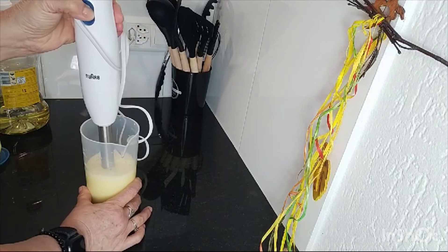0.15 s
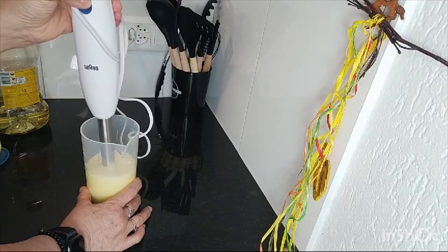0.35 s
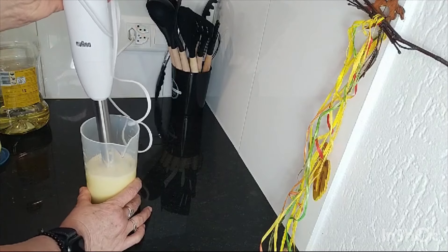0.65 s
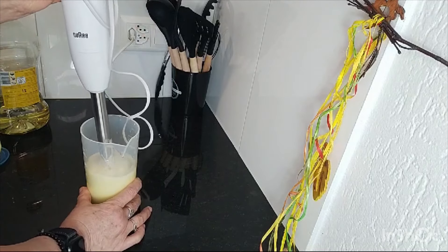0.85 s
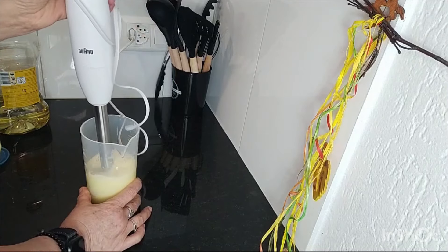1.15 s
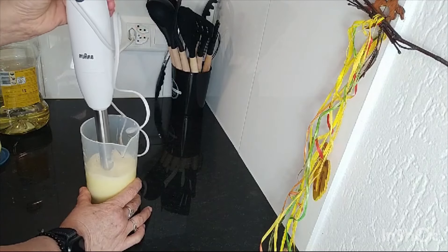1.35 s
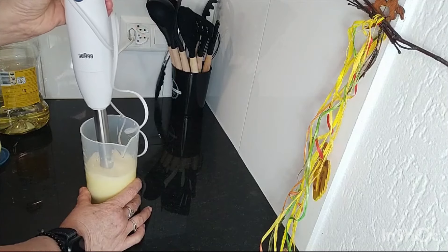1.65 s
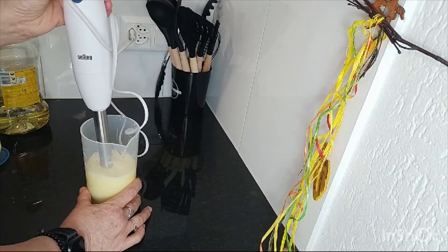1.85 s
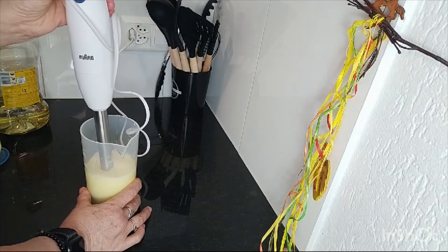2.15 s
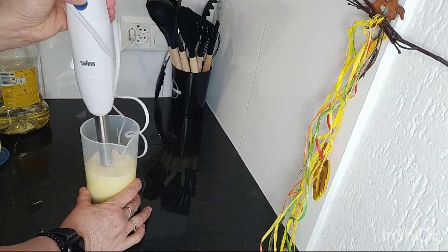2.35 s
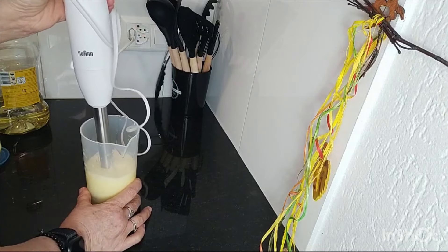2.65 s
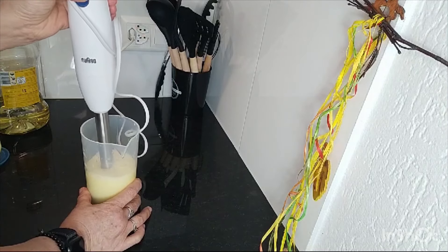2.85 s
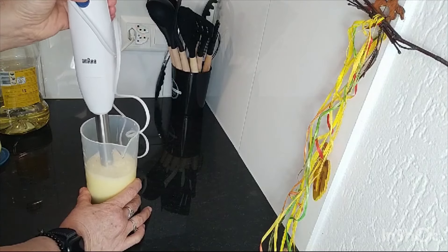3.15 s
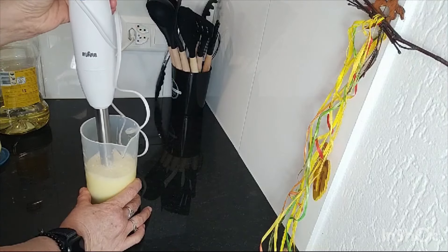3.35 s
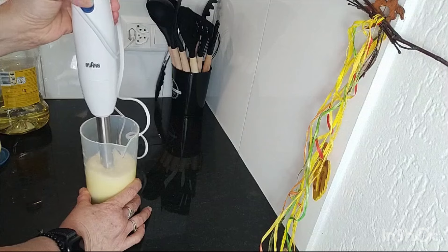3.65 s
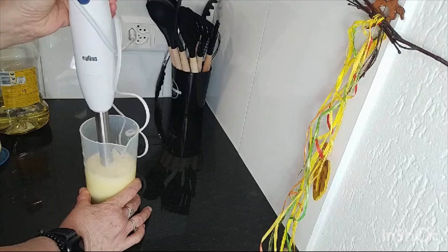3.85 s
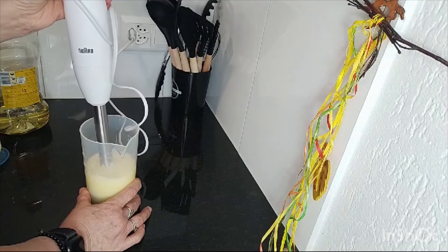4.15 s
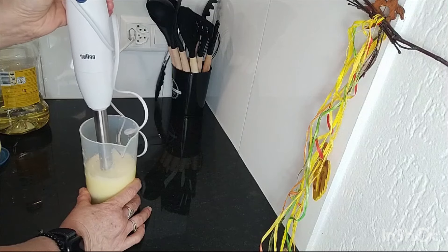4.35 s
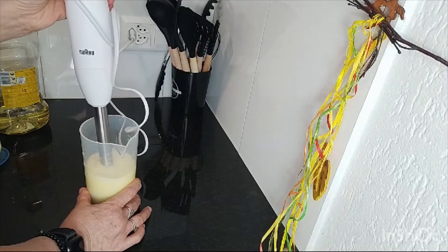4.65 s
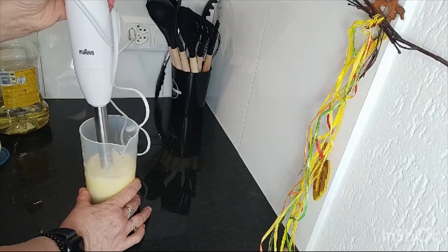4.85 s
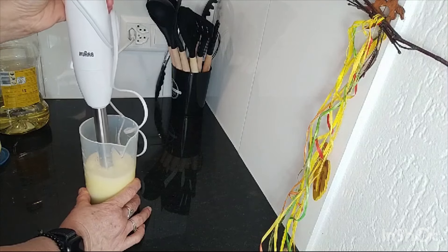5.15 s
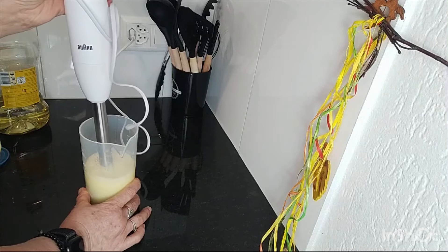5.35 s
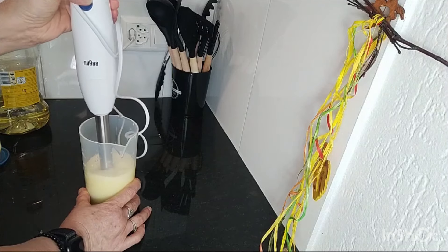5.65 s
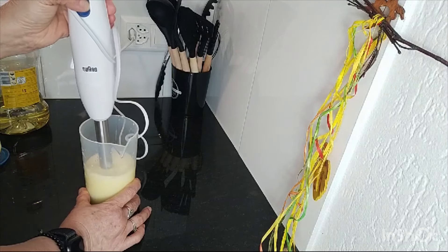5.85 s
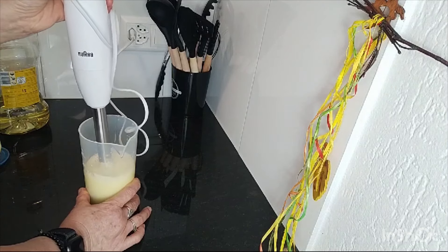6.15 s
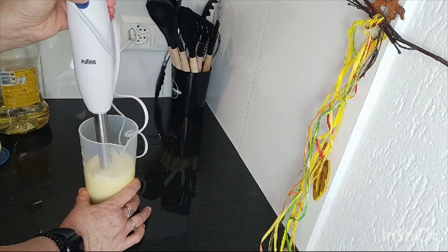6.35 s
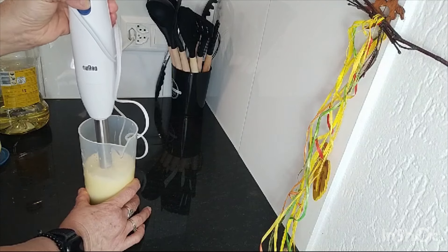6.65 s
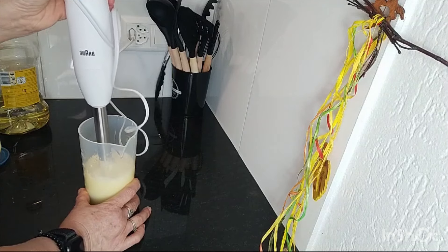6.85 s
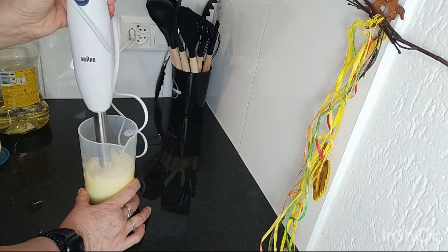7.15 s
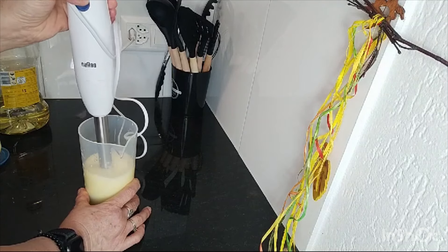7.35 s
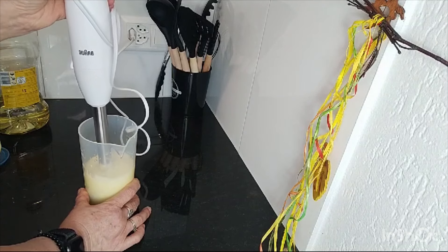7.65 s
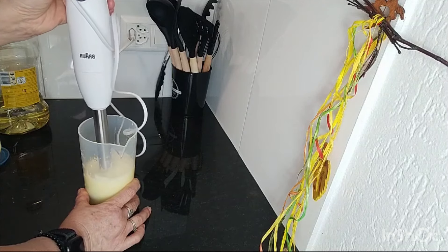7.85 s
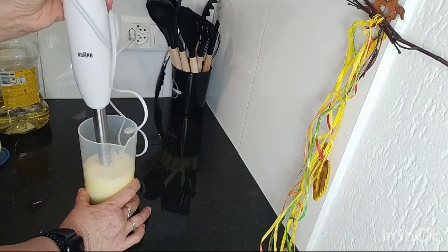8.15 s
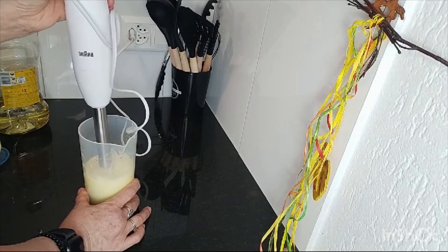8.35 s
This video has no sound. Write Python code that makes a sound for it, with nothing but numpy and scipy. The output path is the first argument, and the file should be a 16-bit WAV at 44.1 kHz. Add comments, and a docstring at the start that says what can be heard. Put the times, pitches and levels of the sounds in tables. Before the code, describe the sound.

An electric stick blender works thick sauce in a plastic cup, heard close with a short room reflection. The opening burst dies away, a few hollow taps sound, then a long buzzing run grows rougher and louder. Quick presses follow, each spinning up almost instantly and winding down, with one sharp knock midway. The last press is very brief and fades towards soft kitchen hum and a faint tap.

```python
"""A hand blender is heard mid-burst in a plastic beaker of thickening sauce, over a low kitchen hum.
It soon coasts down, and the wand knocks on the beaker; a long burst and then shorter ones follow,
with a loud knock early in the third and fainter ones late on. Each press spins the motor up; its speed
and the blade's load set the levels: the shaft hums at multiples of its turning, noise impacts churn
and rattle the beaker, the commutator's uneven pattern whines and filtered noise hisses at the brushes."""
import sys
import numpy as np
from scipy import signal
from scipy.fft import rfft, irfft, next_fast_len
from scipy.io import wavfile

SR = 44100
rng = np.random.default_rng(int(sys.argv[2]) if len(sys.argv) > 2 else 0)


def master(y):
    """Save y as 16-bit WAV."""
    cut = np.clip(np.atleast_2d(y).T, -1, 1)
    pcm = np.round(cut * 32767)  # scale
    wavfile.write(sys.argv[1], SR, pcm.astype(np.int16))


N = 374409
TIME = np.arange(N) / SR   # s


def from_db(db):
    """Decibels to a gain."""
    return 10 ** (np.asarray(db) / 20)


def rms_one(x):
    """Scale a signal to an RMS of 1."""
    return x / np.sqrt(np.mean(x ** 2) + 1e-20)


def drift(rate):
    """Smooth chance with spread 1, changing about `rate` times a second."""
    step = 20   # samples between slow values
    pole = np.exp(-2 * np.pi * rate * step / SR)
    noise = rng.standard_normal(N // step + 4002)
    slow = signal.lfilter([1], [1, -2 * pole, pole * pole], noise)[4000:]   # settled part
    return np.interp(np.arange(N) / step, np.arange(len(slow)), rms_one(slow))


def in_time(rows):
    """The columns of a curve, drawn sample by sample."""
    s, *columns = np.transpose(rows)
    return [np.interp(TIME, s, column) for column in columns]


def band(x, edges_hz, kind, order=4):
    """Butterworth filter."""
    return signal.sosfilt(signal.butter(order, edges_hz, kind, fs=SR, output="sos"), x)


def colour(x, spectrum, resonances=()):
    """Causal filter made of a broad spectrum and resonant peaks."""
    size = 2 * next_fast_len(N // 2 + SR // 4)
    hz = np.maximum(np.arange(size // 2 + 1) * SR / size, 1)
    points = np.array(spectrum)
    db = np.interp(np.log(hz), np.log(points[:, 0]), points[:, 1])
    for centre, width, lift in resonances:
        db = db + lift / (1 + (2 * (hz - centre) / width) ** 2)
    cepstrum = irfft(db * np.log(10) / 20)   # minimum phase: things ring after the blow
    cepstrum[1:size // 2] *= 2
    cepstrum[size // 2 + 1:] = 0
    response = np.exp(rfft(cepstrum))
    return irfft(rfft(x, size) * response)[:N]


def kitchen(x, t60, wet_db, wall_hz):
    """Direct sound plus a dense, dull tail from the tiled walls."""
    t = TIME[:SR // 2]
    tail = band(rng.standard_normal(len(t)), wall_hz, "low", order=1)
    tail = tail * from_db(-60 * t / t60) * (t > .004)   # starts after a 4 ms gap
    tail = tail / np.sqrt(np.sum(tail ** 2))
    return x + from_db(wet_db) * signal.fftconvolve(x, tail)[:N]


# the button is held: (pressed t/s, released t/s, coasting time constant t/s,
# unbalance hum level/dB at reference load, before the shaft's trim)
BUTTON_PRESSES = [(-.5, .256, 0.29, -41), (1.446, 3.94, 0.41, -39), (4.15, 4.57, .38, -40.5),
                  (4.7, 5.272, 0.33, -42), (5.435, 6.61, .34, -42), (6.878, 7.26, 0.34, -36.5),
                  (7.77, 7.942, 0.3, -38)]
SPIN_UP_S = .04   # time constant of running up
FRICTION = .13    # dry friction as a share of the drag at full speed


def motor_run():
    """Speed share and inrush current: the motor runs up at each press, then coasts on drag and friction."""
    pace, inrush = np.zeros((2, N))
    for on, off, coast_s, _ in BUTTON_PRESSES:
        held = np.clip(TIME, on, off) - on
        lacking = (1 - np.interp(on, TIME, pace)) * np.exp(-held / SPIN_UP_S)
        fade = np.exp(-np.maximum(TIME - off, 0) / coast_s)
        coasting = (1 - lacking + FRICTION) * fade - FRICTION
        pace = np.where(TIME >= on, np.maximum(coasting, 0), pace)
        inrush = np.where(TIME >= on, lacking * (TIME < off), inrush)
    return pace, inrush


def latest_press():
    """For every sample, the row of the press that began last."""
    rows = np.array(BUTTON_PRESSES)
    return rows[np.searchsorted(rows[:, 0], TIME, side="right") - 1].T


def impacts(turn, per_s, size_db, swing_db, clump_db, clump_rate, wash):
    """Blade hits on sauce and air pockets: random and in clumps; swing_db favours one side of a turn."""
    struck = rng.random(N) < per_s / SR
    hits = struck * rng.standard_normal(N) * from_db(size_db * np.minimum(rng.exponential(1, N), 4))
    stream = rms_one(hits) + wash * rng.standard_normal(N)
    return rms_one(stream * from_db(swing_db * np.cos(turn) + clump_db * drift(clump_rate)))


# broad colour of the churning: (f/Hz, relative level/dB)
CHURN_COLOUR = [(70, -44), (100, -16.5), (135, -18), (170, -9), (230, -11), (310, -5), (440, -2.5),
                (620, -6), (800, -1), (1100, -2.5), (1500, -7), (2200, -9), (2700, -13), (3600, -18),
                (4500, -24.5), (7000, -38.5)]
# resonances of beaker, wand and counter: (f/Hz, width f/Hz, lift level/dB above the broad colour)
BODY_RESONANCES = [(199.6, 63, 8.5), (344.2, 49, 14), (483, 38, 1.5), (587, 30, 6), (712, 60, 7.5),
                   (774, 118, 7.5), (911, 29, 5), (1000, 86, 6), (1053, 20, 5), (1227, 130, 2.5),
                   (1230, 52, 2), (1382, 110, 4.5), (1565, 33, 5), (1632, 40, 7.5), (1893, 99, 3.5),
                   (2035, 108, 6), (3690, 78, 4)]


def churning(turn, deep, rattle, crackle):
    """Heavy slaps shake the beaker's low resonances; small collapsing pockets crackle above them."""
    slaps = impacts(turn, per_s=1300, size_db=1, swing_db=0, clump_db=.5, clump_rate=26, wash=.67)
    pops = impacts(turn, per_s=1600, size_db=.3, swing_db=-1, clump_db=1.2, clump_rate=17.6, wash=1)
    heavy = colour(slaps, CHURN_COLOUR, BODY_RESONANCES)
    fine = colour(pops + .64 * slaps, CHURN_COLOUR, BODY_RESONANCES)
    low = rms_one(band(heavy, 621, "low", order=6))
    middle = rms_one(band(heavy, [590, 1200], "band"))
    high = rms_one(band(fine, 1197, "high", order=6))
    return from_db(-3.5) * deep * low + from_db(-5) * rattle * middle + from_db(-1.5) * crackle * high


# weaker shaft orders: (multiple of the turning, level/dB against the rattle)
SHAFT_OVERTONES = [(3, -19.5), (5, -14), (6, -26), (7, -19), (8, -24), (10, -23), (11, -27)]
HUM_POWER = 7.5   # all orders die with this power of speed


def shaft(turn, pace, once, twice, four, rattle, flutter_db, chop_db, wobble, speed_power):
    """Unbalance and two blade wings hum in low orders shaken by uneven load; upper ones fade sooner."""
    drive = pace ** speed_power
    choppy = rms_one(from_db(chop_db * drift(80)))   # the wings bite and slip in the sauce
    orders = [(1, once * from_db(-4)),
              (2, twice * from_db(-.5)),
              (4, four * choppy * drive * from_db(-3.5))]
    orders += [(multiple, rattle * drive * from_db(db)) for multiple, db in SHAFT_OVERTONES]
    angle = turn + wobble * drift(16.6)   # wobble in radians
    tones = np.zeros(N)
    for multiple, gain in orders:
        flutter = from_db(flutter_db * drift(17))
        tones += gain * flutter * np.sin(multiple * angle + rng.uniform(0, 2 * np.pi))
    return np.sqrt(2) * tones * pace ** HUM_POWER


# commutator whine: (multiple of the turning, relative level/dB, level/dB lost per side order)
WHINE_ORDERS = [(24, -17, 11), (36, -10, 11), (39, -21, 5), (48, -9.5, 11), (60, -10, 5), (72, -7, 6),
                (75, -15, 6), (84, -8, 7), (96, -7, 7), (108, -7, 7), (120, -7, 7), (132, -7, 7)]
# motor housing resonances that the gliding whine sweeps through: (f/Hz, relative level/dB)
HOUSING_COLOUR = [(1200, 3), (2800, 16.5), (4000, 1.5), (5600, -2.5), (7100, -1), (8300, -3.5), (9300, -2),
                  (10200, -10.5), (11700, -3.5), (12700, 1), (13700, 7.5), (14500, 2.5), (15600, -3.5)]
# colour of the brush hiss: (f/Hz, relative level/dB)
HISS_COLOUR = [(1500, 4.5), (3000, 4.5), (4500, -12), (5500, 0.5), (6300, -1), (7600, 6.5), (8600, -3),
               (10200, -8.5), (11700, 2), (12800, 3), (14200, 11), (15000, 14.5), (15700, 4), (17000, -37)]
MAINS_HZ = 50


def commutator(turn, whine_gain, hiss_gain, jitter, ripple, bounce, flutter_db):
    """Uneven segments tick past the brushes with side orders; the pattern shifts as the brushes bounce."""
    throb = np.sin(2 * np.pi * (2 * MAINS_HZ) * TIME)   # torque throbs with each mains half-cycle
    angle = turn + jitter * drift(25) + ripple * throb  # jitter and ripple in radians
    orders = np.arange(136)
    skirts = [from_db(db - skirt_db * abs(orders - multiple)) for multiple, db, skirt_db in WHINE_ORDERS]
    strength = np.max(skirts, axis=0)
    size = 4096   # points in one turn
    place = angle / (2 * np.pi) % 1 * size
    whine = np.zeros(N)
    for share in (1, bounce * drift(60), bounce * drift(60)):   # one steady and two shifting patterns
        phases = np.exp(2j * np.pi * rng.random(len(orders)))
        one_turn = irfft(strength * phases, size) * size / 2
        whine += share * np.interp(place, np.arange(size), one_turn) / np.sqrt(1 + 2 * bounce ** 2)
    sparks = rng.standard_normal(N) * from_db(.8 * np.cos(turn) + flutter_db * drift(30))
    hiss = rms_one(colour(sparks, HISS_COLOUR))
    return whine_gain * colour(whine, HOUSING_COLOUR) + hiss_gain * hiss


# colour of the room noise: (f/Hz, relative level/dB)
ROOM_COLOUR = [(41, -21), (70, -3), (144, -20), (198, 2), (547, -15), (585, -15), (879, -6), (1080, -15),
               (2070, -18), (6570, -28), (15500, -20)]
ROOM_DB, HUM_DB, TONE_DB = -72.5, -63.5, -85.5
HUM_HZ, TONE_HZ = 51, 592


def background():
    """Soft filtered room noise, a low, slightly wavering sine hum and a faint steady tone."""
    hum = np.sqrt(2) * np.sin(2 * np.pi * HUM_HZ * TIME + .2 * drift(3)) * from_db(.92 * drift(4))
    tone = np.sqrt(2) * np.sin(2 * np.pi * TONE_HZ * TIME)
    room = rms_one(colour(rng.standard_normal(N), ROOM_COLOUR))
    return from_db(ROOM_DB) * room + from_db(HUM_DB) * hum + from_db(TONE_DB) * tone


# wand knocks and switch clicks: (t/s, level/dB, crack level/dB and thump level/dB against that)
WAND_KNOCKS = [(.757, -39.5, -22, -12), (.858, -63, -6, -12), (0.958, -50, -3, -13), (.98, -32, -13, -13),
               (1.017, -54, -3, -13), (1.041, -49, -18, -6), (1.109, -56, -19, -1), (1.297, -64, -4, -22),
               (1.447, -50, -3, -30), (4.314, -14.5, -21.5, -37), (7.625, -46, -16, -32),
               (7.773, -55, -9, -30), (8.444, -45.5, -27, -27)]
# the struck beaker's ring: (f/Hz, mean level/dB against the knock, t60 t/s)
BEAKER_MODES = [(339, -16, 0.15), (728, -8, 0.099), (960, -2.5, 0.1), (1050, -26, 0.11),
                (1040, -19.5, 0.11), (1324, -44, 0.067), (3090, -22, 0.044), (3770, -44, 0.054)]


def knocks(body_db, body_t60, crack_t60, thump_hz, thump_t60):
    """Each touch gives a short crack, sets the beaker ringing and thumps the counter."""
    out, t = np.zeros(N + SR), TIME[:SR // 2]
    shake = rms_one(colour(rng.standard_normal(N), CHURN_COLOUR))
    for s, db, crack_db, thump_db in WAND_KNOCKS:
        at = round(s * SR)
        body = np.roll(shake, at)[:len(t)] * from_db(body_db - 60 * t / body_t60)
        ring = np.zeros(len(t))
        for hz, mode_db, t60 in BEAKER_MODES:
            decay = from_db(mode_db + rng.normal(0, 5.9) - 60 * t / t60)   # each touch excites it afresh
            ring += decay * np.sin(2 * np.pi * hz * t) * rng.choice([-1, 1])
        crack = band(rng.standard_normal(len(t)), [2200, 5200], "band", order=1)
        crack = crack * from_db(crack_db - 60 * t / crack_t60)
        thump = np.sin(2 * np.pi * thump_hz * t) * from_db(thump_db - 60 * t / thump_t60)
        out[at:at + len(t)] += from_db(db) * (body + ring + crack + thump)
    return out[:N]


# speed held under power, sagging as the sauce thickens: (t/s, turns per s)
RUNNING_SPEED_CURVE = [(0, 198.5), (.3, 199), (1.6, 194.5), (1.8, 195), (1.95, 199), (2.1, 195.5),
                       (2.3, 193.5), (2.52, 196.6), (2.7, 193.6), (3, 191.7), (3.25, 193.5), (3.7, 191),
                       (4.9, 190.3), (5.26, 192.3), (5.7, 189.3), (6.28, 190.3), (6.6, 188.5), (7.9, 190)]
# how hard the blade works the sauce, at full speed before trims:
# (t/s, beaker rattle level/dB, crackle level/dB)
BLADE_LOAD = [(.25, -35.5, -30), (.55, -17.5, -28.5), (1.55, -41, -42.5), (1.7, -36, -37.5),
              (1.92, -43, -38.5), (2.25, -31.5, -32), (2.5, -32.5, -34), (2.82, -26, -32.5),
              (3, -29, -24.5), (3.42, -23, -30.5), (3.67, -25, -23.5), (4.15, -23, -29.5),
              (4.35, -20.5, -25.5), (4.9, -22, -27), (5.05, -22, -26.5), (5.45, -24, -28),
              (5.8, -17, -22.5), (5.93, -23.5, -21.5), (6.22, -20, -27), (6.6, -21.5, -19.5),
              (6.78, -16, -21.5), (6.9, -17, -25.5), (7.32, -21, -23), (7.9, -18, -26)]
# grip of the two wings as the wand is raised and lowered, at full speed before trims:
# (t/s, wing hum level/dB, deep churn level/dB)
WING_GRIP = [(.3, -62, -44), (1.55, -65, -49), (1.7, -35.5, -40.5), (1.92, -56, -46), (2.22, -30.5, -36),
             (2.45, -47, -40.5), (2.9, -31, -32), (3.2, -51, -34.5), (3.3, -35, -36.5),
             (3.62, -26.5, -29.5), (3.82, -47, -31), (4.52, -29.5, -31), (4.75, -33.5, -31),
             (5.05, -30, -31), (5.7, -32, -28.5), (6.25, -37, -28.5), (6.5, -32.5, -27), (7, -33, -28),
             (7.9, -41, -30)]
# seating of the brushes, at full speed: (t/s, hiss level/dB at reference load, whine level/dB)
BRUSH_SEATING = [(.25, -35, -38), (1.5, -42, -46), (2.2, -41, -38.5), (3.3, -39.5, -38), (4.4, -38, -38.5),
                 (5.1, -39, -37), (5.7, -37.5, -39), (6.25, -39.5, -37.5), (7.1, -38, -38.5),
                 (7.9, -43, -39)]
REFERENCE_LOAD_DB = -20
# the churning grows with these powers of speed
DEEP_POWER, RATTLE_POWER, CRACKLE_POWER = 2.235, 2.32, 2.14
# the sauce sloshes against the blade: spread (dB), rate (per s)
SLOSH_DB, SLOSH_RATE = .78, 5.9
# after each press the blade bites into sauce that has flowed back: changes (dB) that fade (s)
BITE_RATTLE_DB, BITE_DEEP_DB, BITE_UNBALANCE_DB, BITE_S = -1.5, 2, 8.5, .42
# once a turn: dB per dB of rattle; four times a turn: dB at reference load, dB per dB of rattle
UNBALANCE_PER_LOAD, GROWL_DB, GROWL_PER_LOAD = .56, -21, 1.2
# the hiss follows the current (dB per dB of crackle); sparks at switch-on (dB)
HISS_PER_LOAD, INRUSH_DB = .22, -54
# whine and hiss grow with powers of speed; the hiss levels off above a share of full speed
WHINE_POWER, HISS_POWER, HISS_KNEE = 2.62, 1.79, .55


def scene():
    """Motor speed and blade load drive the blender's continuous parts, heard close up in the kitchen."""
    pace, inrush = motor_run()
    pressed_s, _, _, unbalance_db = latest_press()
    bite = np.exp(-(TIME - pressed_s) / BITE_S)
    running_speed, = in_time(RUNNING_SPEED_CURVE)
    rattle_db, crackle_db = in_time(BLADE_LOAD)
    wings_db, deep_db = in_time(WING_GRIP)
    hiss_db, whine_db = in_time(BRUSH_SEATING)
    turn = 2 * np.pi * np.cumsum(pace * running_speed) / SR   # shaft angle in radians

    slosh_db = SLOSH_DB * drift(SLOSH_RATE)
    rattle_db = rattle_db + BITE_RATTLE_DB * bite + slosh_db
    load_db = rattle_db - REFERENCE_LOAD_DB
    rattle = from_db(rattle_db) * pace ** RATTLE_POWER
    crackle = from_db(crackle_db) * pace ** CRACKLE_POWER
    deep = from_db(deep_db + BITE_DEEP_DB * bite + slosh_db) * pace ** DEEP_POWER
    unbalance = from_db(unbalance_db + UNBALANCE_PER_LOAD * load_db + BITE_UNBALANCE_DB * bite)
    growl = from_db(GROWL_DB + GROWL_PER_LOAD * load_db)
    whine = from_db(whine_db) * pace ** WHINE_POWER
    hiss = from_db(hiss_db + HISS_PER_LOAD * (crackle_db - REFERENCE_LOAD_DB))
    hiss = hiss * np.tanh(pace / HISS_KNEE) ** HISS_POWER

    motor = commutator(turn, whine, hiss + from_db(INRUSH_DB) * inrush,
                       jitter=.002, ripple=.016, bounce=.4, flutter_db=1.1)
    touches = knocks(body_db=-10.5, body_t60=.09, crack_t60=.044, thump_hz=106, thump_t60=.22)
    hum = shaft(turn, pace, unbalance, from_db(wings_db), growl, rattle,
                flutter_db=1.9, chop_db=3.5, wobble=.14, speed_power=1)
    churn = churning(turn, deep, rattle, crackle)

    blender = kitchen(churn, t60=.3, wet_db=-11, wall_hz=5000)
    blender += kitchen(motor, t60=.2, wet_db=-9, wall_hz=9000)
    blender += kitchen(touches, t60=.54, wet_db=-12.5, wall_hz=4000)
    return (blender + hum + background())[None]


def record(dry):
    """A steep elliptic low-pass cuts the top above 15750 Hz."""
    return signal.sosfilt(signal.ellip(12, .1, 90, 15750, fs=SR, output="sos"), dry)


dry = scene()
out = record(dry)
master(out)
```